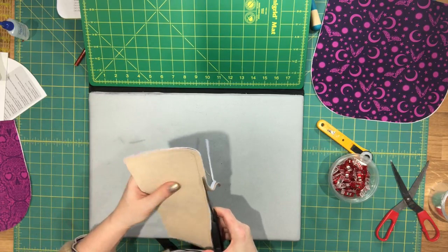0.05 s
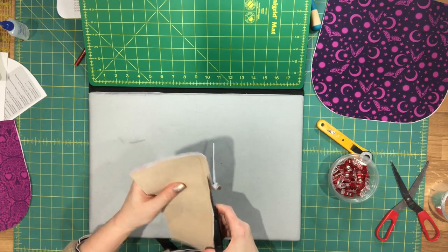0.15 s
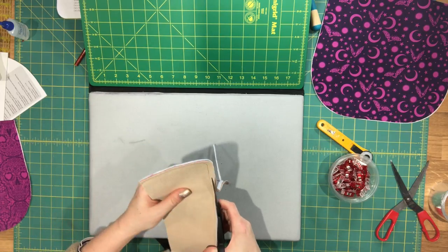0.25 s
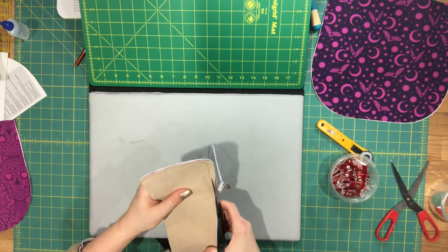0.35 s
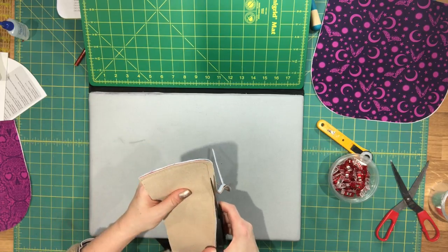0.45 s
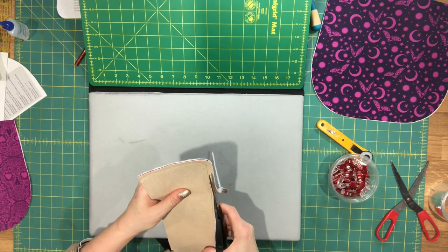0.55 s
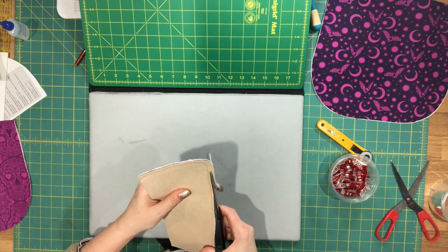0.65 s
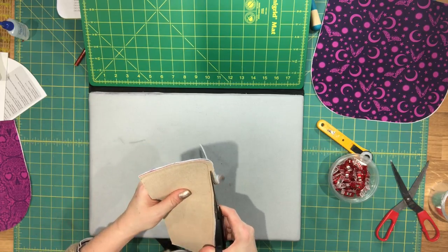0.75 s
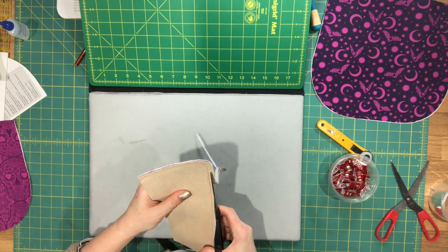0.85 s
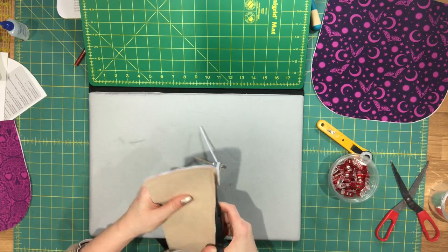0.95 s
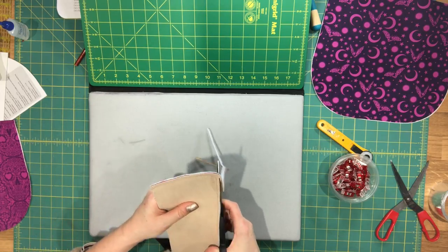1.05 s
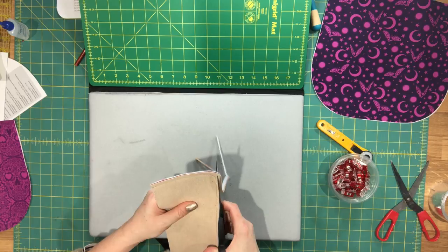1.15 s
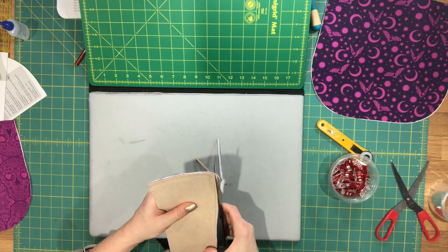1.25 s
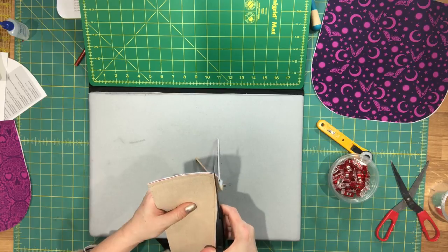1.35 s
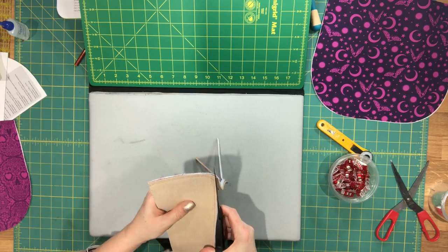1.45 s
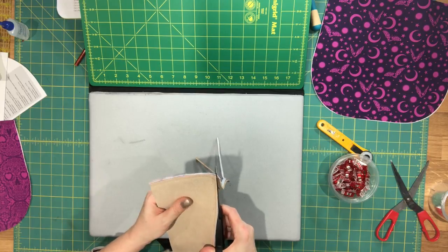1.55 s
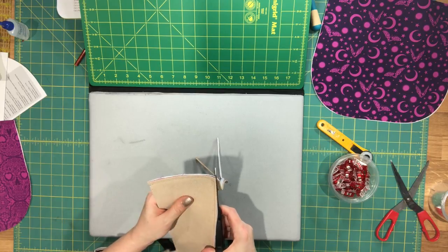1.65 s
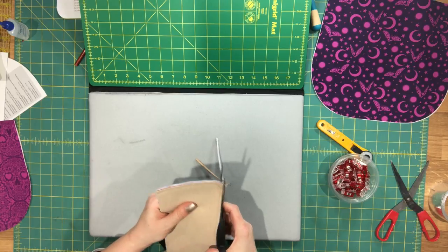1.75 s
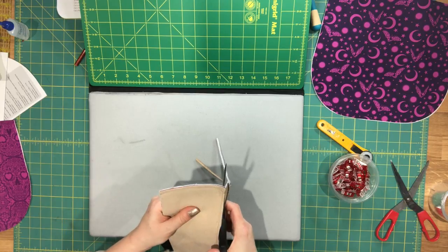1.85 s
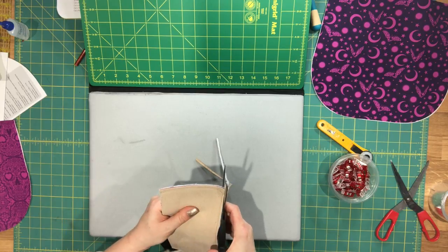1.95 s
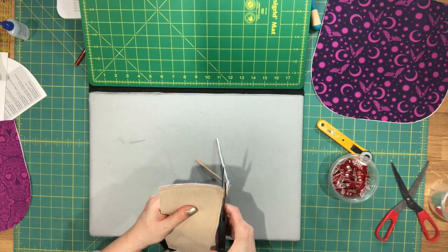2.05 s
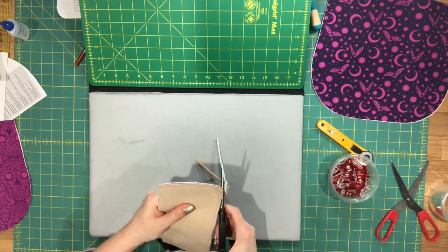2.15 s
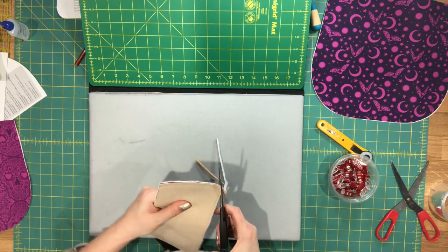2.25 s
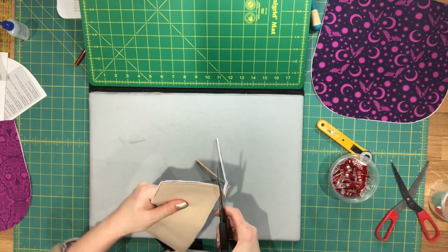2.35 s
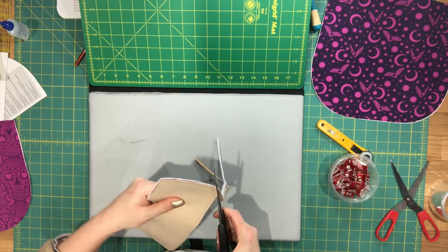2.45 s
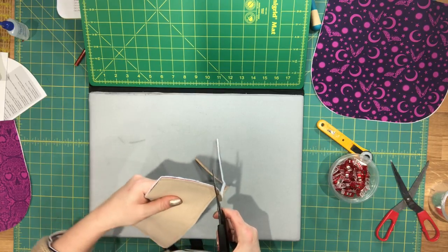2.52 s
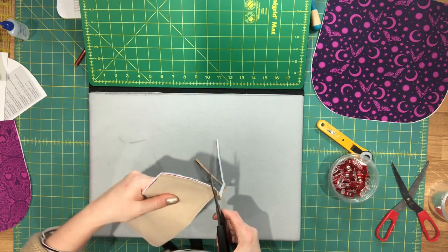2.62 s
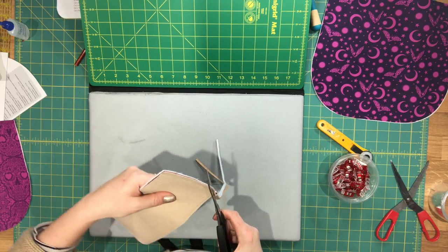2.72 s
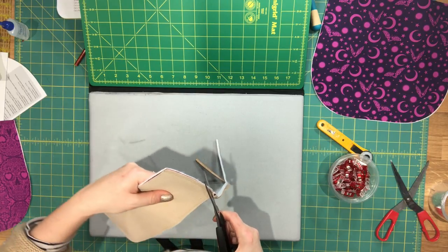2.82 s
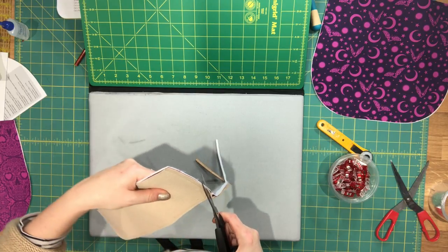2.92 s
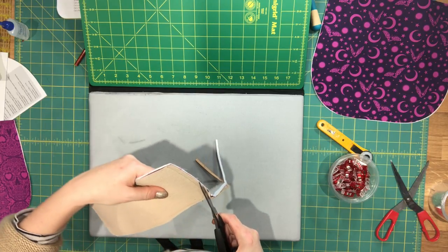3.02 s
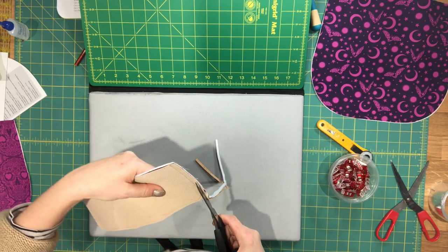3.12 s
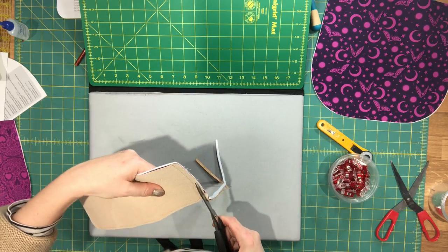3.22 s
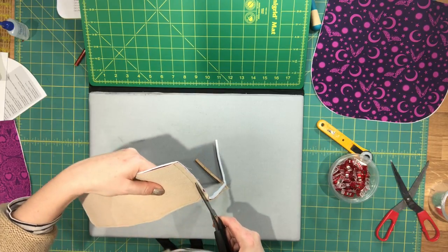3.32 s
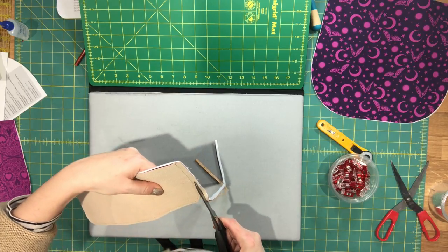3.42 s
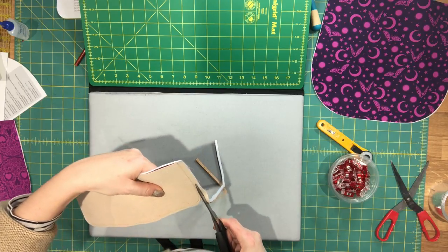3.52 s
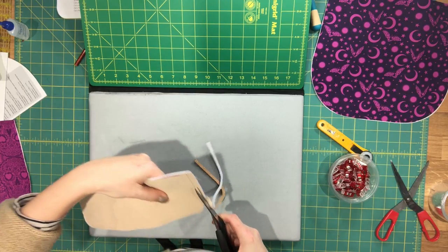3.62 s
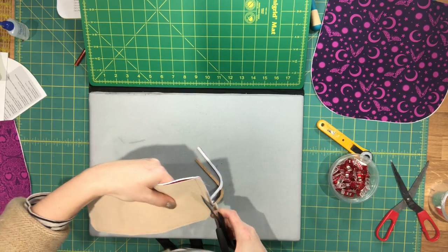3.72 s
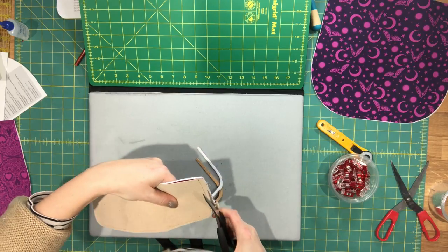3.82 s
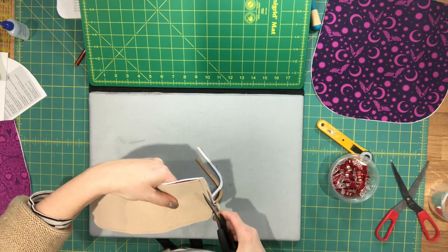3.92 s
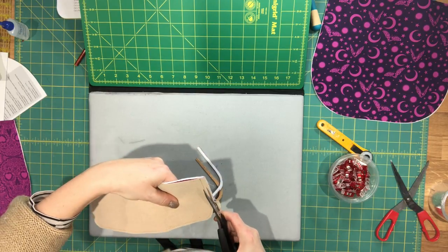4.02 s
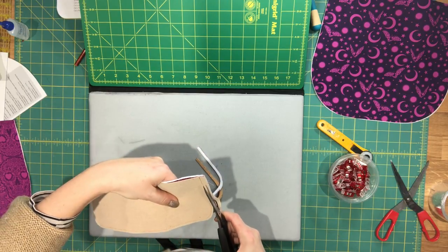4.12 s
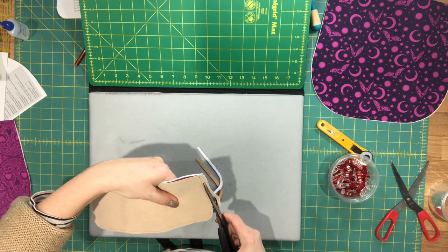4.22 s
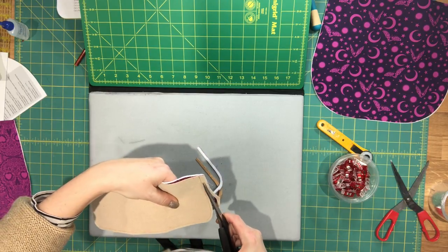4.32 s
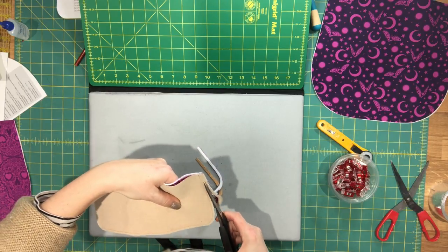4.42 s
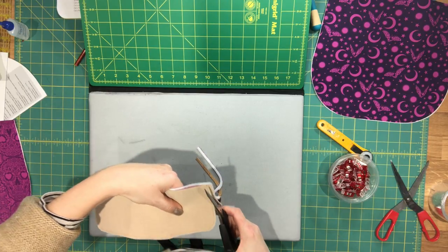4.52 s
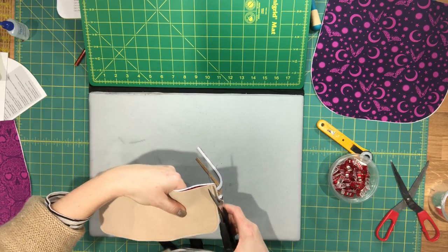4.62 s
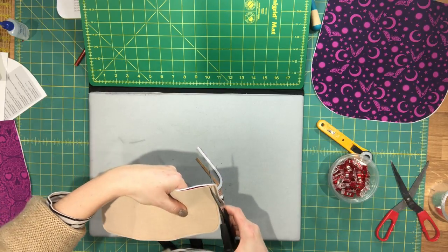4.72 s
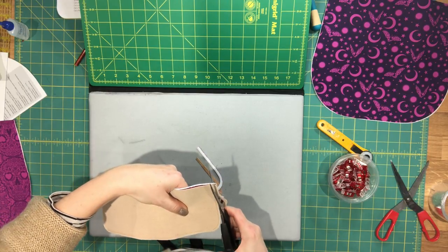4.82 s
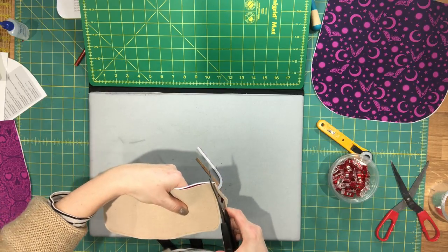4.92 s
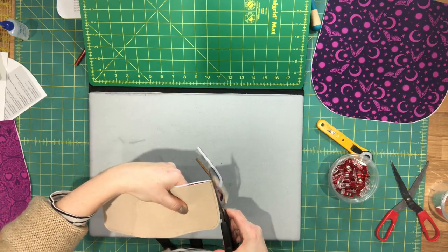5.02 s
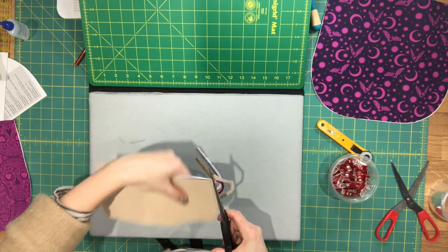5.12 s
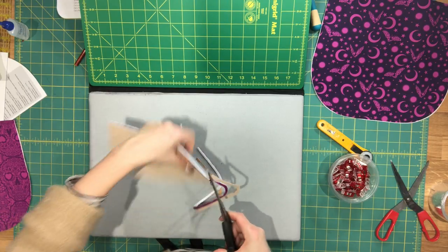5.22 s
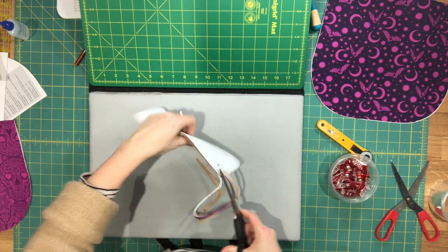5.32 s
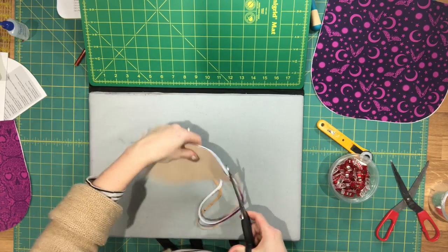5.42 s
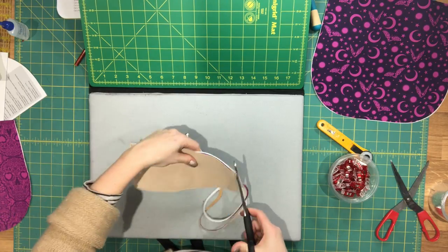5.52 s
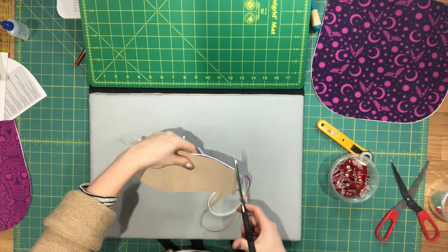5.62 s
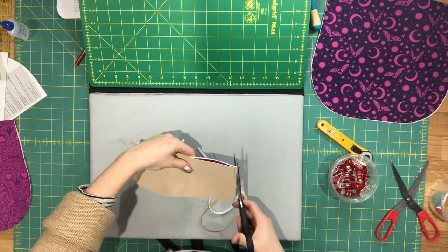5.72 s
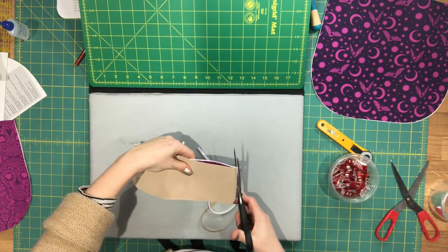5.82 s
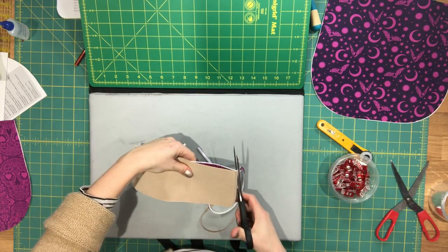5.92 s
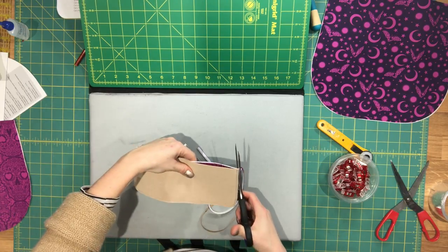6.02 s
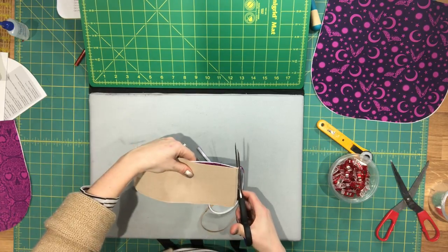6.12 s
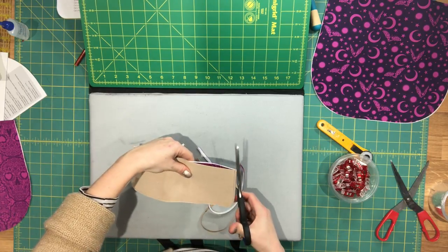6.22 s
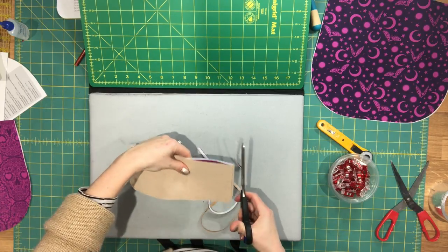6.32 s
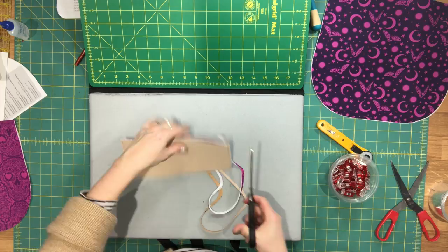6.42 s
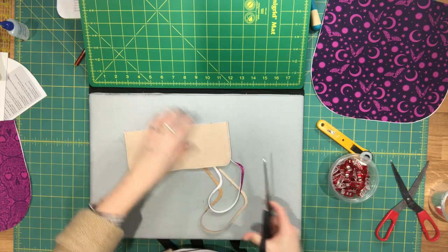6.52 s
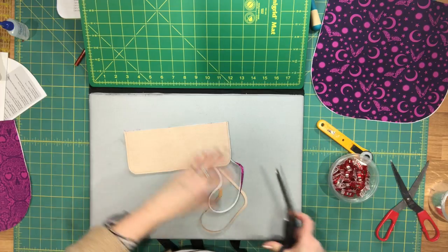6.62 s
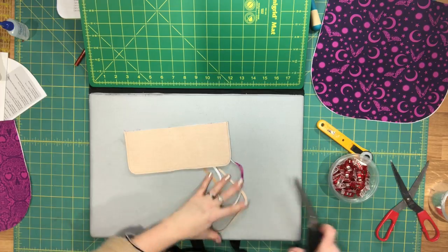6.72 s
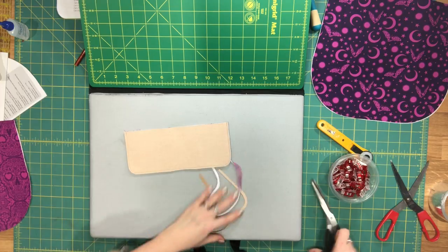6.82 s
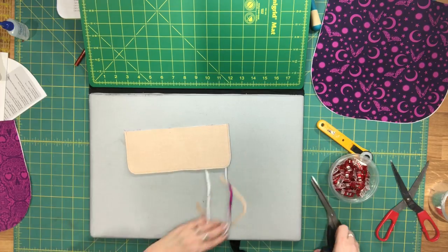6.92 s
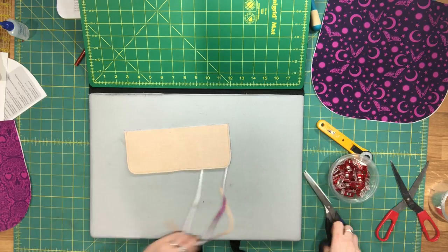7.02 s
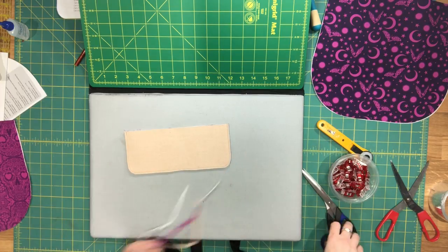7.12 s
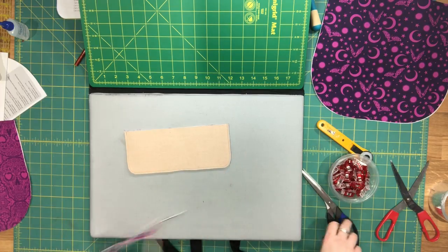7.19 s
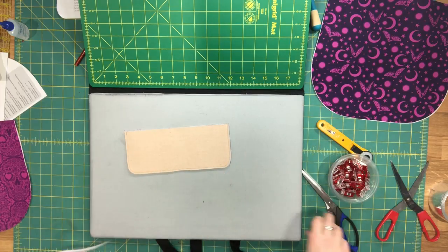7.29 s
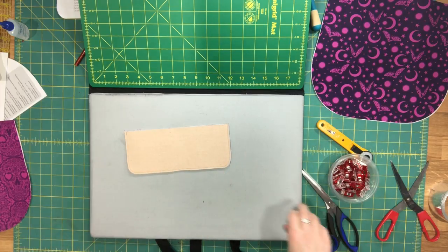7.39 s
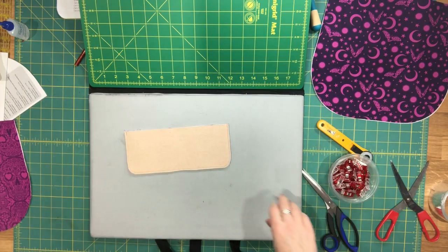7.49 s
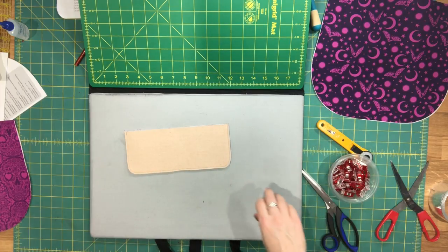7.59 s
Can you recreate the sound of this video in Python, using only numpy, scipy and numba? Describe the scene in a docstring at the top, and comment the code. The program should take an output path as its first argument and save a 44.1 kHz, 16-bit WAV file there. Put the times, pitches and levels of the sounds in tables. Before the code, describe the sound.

Quiet close scissor cuts with metallic rasp and small ticks, one hard steel snap, a cloth sweep and heavy final clunks.

```python
"""A low machine hum, rumble and faint air (tones and coloured noise) fill a small room throughout.
Cloth rustles (brushed noise), then shears hiss open (fine grains) and cut in short strokes until about 6 s.
The cuts crunch and rasp: tiny thread clicks pass through steel resonances, among ticks, clicks and scrapes.
Just after 5 s the blades snap shut once, with a crack, a rattle and a brief ring.
Last, the shears clatter on the cutting table (struck modes and noise) as offcuts are swept away."""
import sys
import numpy as np
from scipy import signal
from scipy.fft import rfft, irfft, next_fast_len
from scipy.io import wavfile
from scipy.ndimage import uniform_filter1d
from numba import njit

SR = 44100
rng = np.random.default_rng(int(sys.argv[2]) if len(sys.argv) > 2 else 0)


def to_wav(sig):
    """Store sig (one row per channel, or 1-D mono) as 16-bit WAV at the path in sys.argv[1].

    Samples outside -1..1 are clipped; the rate is SR.
    """
    pcm = np.clip(np.atleast_2d(sig), -1, 1) * 32767
    pcm = np.round(pcm).astype(np.int16)
    wavfile.write(sys.argv[1], SR, pcm.T)  # frames by channels


N = 337490
T = np.arange(N) / SR
HIT_T = T[:SR // 2]  # time within one hit, in seconds


def undb(db):
    """Decibels to gain."""
    return 10 ** (np.asarray(db) / 20)


def unit(x):
    """Scale to rms 1."""
    return x / np.sqrt(np.mean(x ** 2))


def unit_hit(x):
    """Scale a hit to the energy of rms 1 held for a hundredth of a second."""
    return x / np.sqrt(np.sum(x ** 2) / (SR / 100))


def add(out, start_s, x):
    """Mix x into out from a start time."""
    i = int(start_s * SR)
    out[i:i + len(x)] += x[:len(out) - i]


def band(x, hz, kind, order=2):
    """Butterworth filter that keeps the lows or the highs."""
    sos = signal.butter(order, np.minimum(hz, SR / 2 - 10), kind, fs=SR, output="sos")
    return signal.sosfilt(sos, x)


def colour(x, points):
    """Shape the tone through (pitch_hz, level_db) points, without sounding before the input does."""
    size = next_fast_len(len(x) + 4096) * 2
    hz, db = np.transpose(points)
    f = np.maximum(np.arange(size // 2 + 1) * SR / size, 1)
    curve_db = np.interp(np.log(f), np.log(hz), db)
    # folding the cepstrum forward gives the minimum-phase filter
    cepstrum = irfft(np.log(undb(curve_db)))
    cepstrum[1:size // 2] *= 2
    cepstrum[size // 2 + 1:] = 0
    return irfft(rfft(x, size) * np.exp(rfft(cepstrum)))[:len(x)]


@njit
def svf(x, hz, width):
    """State-variable band-pass with a moving centre."""
    y, band_state, low_state = np.empty(len(x)), 0., 0.
    for i in range(len(x)):
        g, k = np.tan(np.pi * hz[i] / SR), width / hz[i]
        v = (band_state + g * (x[i] - low_state)) / (1 + g * (g + k))
        band_state = 2 * v - band_state
        low_state += 2 * g * v
        y[i] = k * v
    return y


def resonate(x, hz, width):
    """One resonance, fixed or moving, with gain 1 at the centre."""
    centre = np.minimum(hz, SR * 9 / 20) * np.ones(len(x))
    return svf(x + 1e-18, centre, float(width))  # the tiny offset avoids slow arithmetic in silence


def walk(rate):
    """Slow chance: slides between random values, rate of them per second, with a spread near 1."""
    k = max(int(SR / rate), 1)
    steps = np.repeat(rng.standard_normal(N // k + 1), k)
    return unit(uniform_filter1d(steps, k))[:N]


def grains(per_s, spread_db):
    """Random tiny clicks of uneven size."""
    happens = rng.random(N) < per_s / SR
    return unit(happens * rng.standard_normal(N) * undb(spread_db * rng.standard_normal(N)))


def gate(start, end, fade):
    """1 between start and end, with sloping sides."""
    return np.clip(np.minimum(T - start, end - T) / fade + .5, 0, 1)


def effort(t, attack, hold, release, power):
    """A movement of the hand: force builds, holds and lets go; power 1 makes straight slopes."""
    return np.clip(np.minimum(t / attack, 1 + (attack + hold - t) / release), 0, 1) ** power


def fade_out(t60):
    """Exponential decay of a hit, by 60 dB in t60 seconds."""
    return np.exp(-np.log(1000) * HIT_T / t60)


def burst(t60):
    """Noise that dies away."""
    return unit_hit(rng.standard_normal(len(HIT_T)) * fade_out(t60))


def ring(modes, damping):
    """Struck modes decay together; every blow shares its energy among them differently."""
    total = np.zeros(len(HIT_T))
    for hz, db, t60 in modes:
        strength = undb(db + 2 * rng.standard_normal()) * rng.choice([-1, 1])
        total += strength * np.sin(2 * np.pi * hz * HIT_T) * fade_out(t60 / damping)
    return unit_hit(total)


def crack(hz, t60):
    """Steel meets something hard: a few cycles of one heavily damped resonance."""
    return unit_hit(np.sin(2 * np.pi * hz * HIT_T) * fade_out(t60))


def room(x, wet_db, t60=0.315, treble_t60=0.099):
    """Near walls return a short tail whose treble dies first."""
    tail = band(burst(t60), 7300, "low") + 1.143 * band(burst(treble_t60), 5775, "high")
    tail *= np.clip(HIT_T / 0.0026 - .5, 0, 1)  # silent at first, full after 4 ms
    tail /= np.sqrt(np.sum(tail ** 2))
    return x + undb(wet_db) * signal.fftconvolve(x, tail)[:N]


# tone of the room's rumble and air: pitch_hz, level_db
RUMBLE_AND_AIR = [(25, -11.5), (55, -1.5), (94, -3), (185, -12.5), (256, -10.5), (326, -18), (427, -17.5),
                  (677, -28.5), (863, -29), (1610, -40.5), (1940, -35), (2610, -40), (2910, -40),
                  (16000, -56.5)]
# tones of the machine's hum: pitch_hz, rms_level_db
HUM = [(54.5, -54.5), (79, -50.5), (130, -53.5), (446.8, -65), (1992, -79.5)]


def background(air_db=-45, rumble_cut_hz=52):
    """Low rumble and faint air are coloured noise; the machine's hum is tones that waver."""
    noise = colour(rng.standard_normal(N), RUMBLE_AND_AIR)
    air = unit(band(noise, rumble_cut_hz, "high", order=5))
    hum = np.zeros(N)
    for hz, db in HUM:
        tone = np.sin(2 * np.pi * hz * T + hz / 90 * walk(6))  # pitch wavers
        hum += undb(db) * unit(tone * undb(2.0 * walk(5)))  # loudness wavers
    return undb(air_db) * air + hum


# cloth handled and swept over the board: start_s, attack_s, hold_s, release_s, level_db
CLOTH_MOVES = [(0, 0.138, 0.145, 0.106, -60.5), (5.128, 0.1474, 0.088, 0.0426, -56),
               (5.378, 0.044, 0.112, 0.049, -60.5), (6.75, 0.0546, 0.1094, 0.047, -48),
               (6.853, 0.1222, 0.0615, 0.109, -40.5), (7.11, 0.0462, 0.0094, 0.0526, -42)]
# tone of the rustle: pitch_hz, level_db
CLOTH_COLOUR = [(290, -8.5), (500, -9), (946, 3.5), (1080, -9), (1510, 3), (2330, 1.5), (2570, 2.5),
                (5390, 0.5), (16000, -13.5)]


def cloth():
    """Fibres brush the board with a smooth rustle that follows the force of the hand."""
    force = np.zeros(N)
    for start, attack, hold, release, db in CLOTH_MOVES:
        force += undb(db) * effort(T - start, attack, hold, release, power=1.167)
    patches = undb(.7 * walk(50))
    rustle = unit(colour(rng.standard_normal(N), CLOTH_COLOUR))
    return force * patches * rustle


# short scrapes of steel and cloth: start_s, length_s, pitch_hz, width_hz (of the second resonance), level_db
SCRAPES = [(0.688, 0.0678, 2937, 300, -54.5), (0.752, 0.065, 4700, 2200, -62), (2.546, .03, 5020, 250, -75),
           (2.6, 0.67, 1592, 400, -69), (3.583, 0.049, 4563, 600, -54.5), (3.781, 0.017, 1220, 300, -57),
           (4.896, 0.047, 6602, 220, -52.5), (4.945, 0.282, 2925, 350, -59),
           (5.069, 0.0148, 8460, 300, -51.5), (5.528, 0.115, 912, 300, -56),
           (5.533, 0.12, 2400, 1800, -64.5), (6.165, 0.0376, 5850, 900, -59.5),
           (6.239, 0.0232, 6010, 1000, -48.5), (7.231, 0.046, 3820, 900, -53),
           (7.314, 0.35, 1910, 1510, -64)]


def scrapes():
    """Brief friction noise, quick to start, excites one resonance twice over."""
    out = np.zeros(N)
    for start, length, hz, width, db in SCRAPES:
        swell = np.sin(np.pi * np.linspace(0, 1, int(length * SR)) ** 0.283)
        rub = resonate(swell * rng.standard_normal(len(swell)), hz, 2 * width)
        add(out, start, undb(db) * unit(resonate(rub, hz, width)))
    return out


# clicks as the grip shifts: start_s, level_db
TAPS = [(3.584, -54), (5.524, -47), (5.606, -56.5), (6.476, -52)]
# tone of the clicks: pitch_hz, level_db
TAP_COLOUR = [(700, -24.5), (1800, 2.5), (3000, 2.5), (4200, 0.5), (6000, -8.5), (16000, -32)]


def taps():
    """The loose shears click dryly in the hand: short coloured noise."""
    out = np.zeros(N)
    for start, db in TAPS:
        click = unit_hit(colour(burst(t60=0.031), TAP_COLOUR))
        add(out, start, undb(db) * click)
    return out


# blades sliding open: start_s, end_s, level_db
OPENINGS = [(0.13, 0.31, -72), (0.941, 1.094, -58.5), (1.726, 1.858, -62), (3.583, 3.769, -63),
            (4.463, 4.607, -65)]
# tone of sliding steel: pitch_hz, level_db
SLIDE_COLOUR = [(1000, 1), (2500, 0), (6500, -1), (9000, -6), (15000, -6)]


def opening():
    """Steel slides on steel with a fine even hiss made of dense tiny clicks."""
    hiss = unit(colour(grains(per_s=16000, spread_db=2.5), SLIDE_COLOUR))
    level = sum(undb(db) * gate(start, end, fade=0.0085) for start, end, db in OPENINGS)
    return hiss * undb(1.0 * walk(90)) * level


# blows on the table: start_s, thud_level_db, steel_clack_level_db, thud_cutoff_hz (lower for softer contact)
BLOWS = [(6.5248, -40, -46.5, 3000), (6.8779, -27, -30.5, 692), (6.897, -30.5, -41, 448),
         (6.9536, -16, -26, 2710), (6.972, -23.5, -37.5, 1500), (7.1046, -24.5, -17.5, 792),
         (7.1414, -15.5, -24, 2000), (7.146, -18, -29, 1780)]
# ringing table: pitch_hz, level_db, t60_s before damping
TABLE_MODES = [(355, -9, .28), (450, -14, .2), (554, -12, .17), (619, -6, .17), (673, -10, .16),
               (974, -2, .13), (1184, -4, .12), (1380, -6, .1), (1590, -1, .08), (1836, -11, .1)]
# shut shears ringing against the table: pitch_hz, level_db, t60_s before damping
SHUT_MODES = [(1461, -7.5, 0.111), (1882, 1.5, 0.052), (3324, -2, 0.059), (3795, 0.5, 0.0293)]
# tones of the thud and of the clack: pitch_hz, level_db
THUD_COLOUR = [(71, -46.5), (120, -18.5), (214, -12.5), (338, -9.5), (498, -11.5), (637, -11), (874, -16.5),
               (971, -10), (1620, -15), (2300, -15.5), (8000, -31.5), (10400, -47), (17600, -120)]
CLACK_COLOUR = [(590, -22), (1000, -20.5), (1200, -51.5), (1370, -6), (1610, -11), (1810, -16.5),
                (2330, -9), (3380, -9.5), (4470, -8), (5440, -13.5), (16000, -24)]


def set_down(table_ring_db=0, steel_ring_db=0, crack_db=-1, rattle_db=0):
    """Hand, blades and handles land on the table; softer contact gives a duller thud."""
    out = np.zeros(N)
    for start, thud_db, clack_db, contact_hz in BLOWS:
        thud = unit_hit(colour(burst(t60=0.1286), THUD_COLOUR))
        thud += undb(table_ring_db) * ring(TABLE_MODES, damping=1.8)
        thud = unit_hit(band(thud, contact_hz, "low", order=4))
        rattle = unit_hit(colour(burst(t60=0.0526), CLACK_COLOUR))
        clack = undb(crack_db) * crack(hz=3197, t60=0.0025) + undb(rattle_db) * rattle
        clack += undb(steel_ring_db) * ring(SHUT_MODES, damping=1.66)
        add(out, start, undb(thud_db) * thud + undb(clack_db) * unit_hit(clack))
    return out


# the blades snap shut: start_s, level_db of the body (crack and ring are set against it)
SNAPS = [(5.085, -23)]
# tone of the snap's body: pitch_hz, level_db
SNAP_COLOUR = [(400, -28.5), (1160, -5), (1730, -22), (2800, -3.5), (3260, -13.5), (3690, -8.5),
               (4700, -13.5), (5300, -5.5), (6850, -4), (8100, -8.5), (11800, -17.5), (16000, -40.5)]
# blades ringing in the hand: pitch_hz, level_db, t60_s
STEEL_MODES = [(1174, 0, .06), (2509, -5, .055), (2762, -3, .04), (4118, -15, .08), (6180, 0, .047),
               (6702, 0, .055), (7300, 0, .03), (8592, -11, .05)]


def snap(crack_db=-7, ring_db=-8.0, rattle_db=-4):
    """The blades hit their stop: a hard crack, a short rattle, and steel ringing briefly in the hand."""
    out = np.zeros(N)
    for start, db in SNAPS:
        rattle = burst(t60=.04)
        steel = ring(STEEL_MODES, damping=1)
        body = unit_hit(colour(burst(t60=0.00404) + undb(rattle_db) * rattle, SNAP_COLOUR))
        hit = body + undb(crack_db) * crack(hz=6830, t60=0.0054) + undb(ring_db) * steel
        add(out, start, undb(db) * hit)
    return out


# resonances of the rubbed blades: pitch_hz, width_hz, level_db
BLADES = [(1587, 132, -2.5), (2067, 248, -0.5), (2756, 326, 0.5), (5764, 526, -9.5), (6725, 380, -6.5),
          (12910, 2200, -7)]


def through_blades(x, ring_db=6):
    """Thread snaps heard directly and through the blades' resonances."""
    ringing = sum(undb(db) * resonate(x, hz, width) for hz, width, db in BLADES)
    return x + undb(ring_db) * ringing


# ticks as the edges catch and jump: start_s, level_db, brightness_db_per_octave (from 1 to 16 kHz)
CATCHES = [(.652, -52, 0), (.729, -48, 0), (1.492, -53.5, 0.5), (2.431, -52, 2.5), (3.38, -47, 1),
           (3.42, -56.5, 1.5), (3.474, -57.5, 2), (5.671, -50, 9)]
# tone of parting threads, here and in the cutting: pitch_hz, level_db
THREAD_COLOUR = [(600, -8), (1000, 1.5), (1540, 0.5), (2800, -0.5), (3800, -0.5), (6550, -1.5),
                 (10000, -11), (16000, -10.5)]


def catches():
    """A bunch of threads gives way at once and jolts the blades: a noise burst through their resonances."""
    out = np.zeros(N)
    for start, db, tilt_db in CATCHES:
        slope = [(1000, 0), (16000, 4 * tilt_db)]  # four octaves
        jolt = through_blades(colour(burst(t60=0.053), THREAD_COLOUR))
        add(out, start, undb(db) * unit_hit(colour(jolt, slope)))
    return out


# strokes of the shears and their duller tails; some cuts are built from several overlapping swells:
# start_s, attack_s, hold_s, release_s, level_db, closure at the start and at the end (0 open, 1 shut),
# edge_rasp_db (treble from 5300 Hz up)
STROKES = [(0.447, 0.1337, 0.027, 0.101, -48, 0.05, 0.82, 3.5),
           (0.671, 0.017, 0.0457, 0.022, -51.5, 0.97, 1, -4),
           (1.219, 0.1048, 0.0302, 0.0964, -46.5, 0, 0.8, 2),
           (1.402, 0.039, 0.0366, 0.043, -57, 0.65, 0.8, -2),
           (2.006, 0.061, 0.053, 0.091, -58, 0.3, 0.07, 5),
           (2.409, 0.023, .006, 0.0397, -55, 0.19, 0.27, 7),
           (2.465, .016, 0.0059, 0.0267, -54.5, 0.3, 0.55, 1.5),
           (2.506, 0.0636, 0.044, 0.066, -59, 0.54, 0.75, 5),
           (2.816, 0.0826, 0.0344, 0.13, -59.5, 0.71, 0.79, 6.5),
           (3.015, 0.0222, 0.0303, 0.073, -58, 0.81, 0.83, 1),
           (3.325, 0.0163, 0.0047, 0.0224, -54.5, 0.79, 0.8, -3.5),
           (3.362, 0.0182, 0.0944, 0.024, -55, 0.64, 0.68, 5.5),
           (3.883, 0.0406, 0.102, 0.112, -61, 0, 0.27, 6.5),
           (3.985, 0.195, 0.122, 0.024, -49, 0.3, 0.95, 7.5),
           (4.797, 0.0176, 0.0072, 0.0163, -51.5, 0.29, 0.34, 7),
           (4.82, 0.0689, 0.1082, 0.023, -50, 0.35, 0.87, 7),
           (5.011, 0.042, 0.061, .008, -49.5, 0.98, 0.9, -1),
           (6.095, 0.0756, .004, 0.067, -59.5, 0, 0.05, 13.5),
           (6.22, 0.0228, 0.0043, 0.0136, -50, 0.31, 0.48, 8.5)]
# resonances of the blade beyond the crossing point, which climb as the shears close:
# open_hz, shut_hz, width_hz, level_db
FREE_BLADE = [(1550, 4900, 650, -1), (4900, 8900, 1000, -6), (7300, 13300, 750, 0),
              (11400, 19000, 2000, -5)]


def cutting(crunch_db=-7, patchy_db=1.88, steel_db=-1):
    """Threads part in bunches; as the free length of the blades shortens, its resonances climb ever faster."""
    out = np.zeros(N)
    snaps = colour(grains(per_s=6000, spread_db=1.5), THREAD_COLOUR)
    # the many close, quickly damped modes of the steel give a metallic grain
    steel = signal.fftconvolve(snaps, burst(t60=0.0476))[:N]
    snaps = unit(snaps) + undb(steel_db) * unit(steel)
    bunches = undb(patchy_db * walk(90))
    # the resonances waver slightly at random, which keeps the rising tones from whistling
    waver = np.exp(.02 * walk(30))
    for start, attack, hold, release, db, closure_start, closure_end, rasp_db in STROKES:
        span = slice(int(start * SR), int((start + attack + hold + release) * SR))
        crunch = snaps[span]
        closure = np.linspace(closure_start, closure_end, len(crunch))
        free = np.zeros(len(crunch))
        for open_hz, shut_hz, width, mode_db in FREE_BLADE:
            hz = open_hz * (shut_hz / open_hz) ** closure ** 2 * waver[span]
            free += undb(mode_db) * resonate(crunch, hz, width)
        edge = [(3700, 0.0044), (5300, rasp_db)]
        cut = through_blades(colour(undb(crunch_db) * crunch + free, edge))
        # even out the loudness, so that force and bunches set it
        even = cut / np.sqrt(uniform_filter1d(cut ** 2, size=2048))
        force = undb(db) * effort(T[span] - start, attack, hold, release, power=0.98)
        add(out, start, force * bunches[span] * even)
    return out


def scene():
    """All the work at the table, heard in the room over the background."""
    work = cutting() + opening() + cloth() + scrapes() + catches() + taps() + set_down()
    return (room(work, wet_db=-13) + room(snap(), wet_db=-14) + background())[None]


def record(dry, top_hz=15900):
    """The microphone above the table cuts the top: a steep low-pass."""
    return signal.sosfilt(signal.ellip(10, .2, 70, top_hz, fs=SR, output="sos"), dry)


dry = scene()
out = record(dry)
to_wav(out)
```